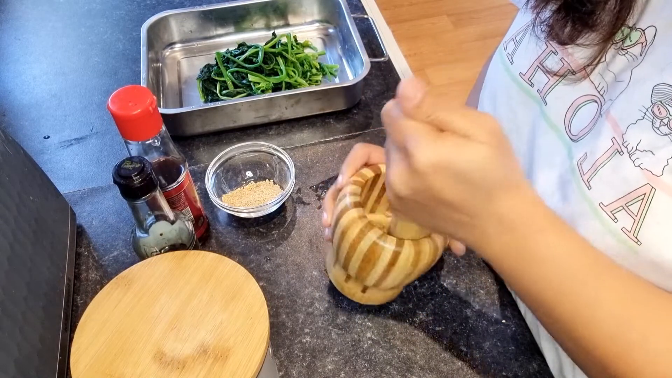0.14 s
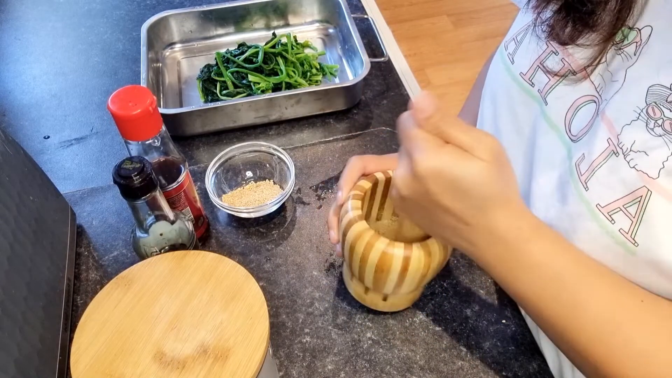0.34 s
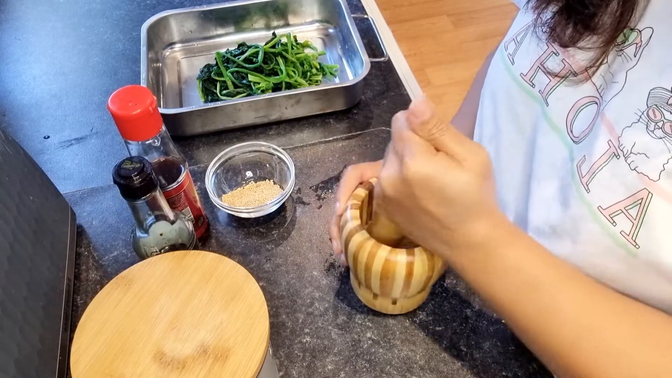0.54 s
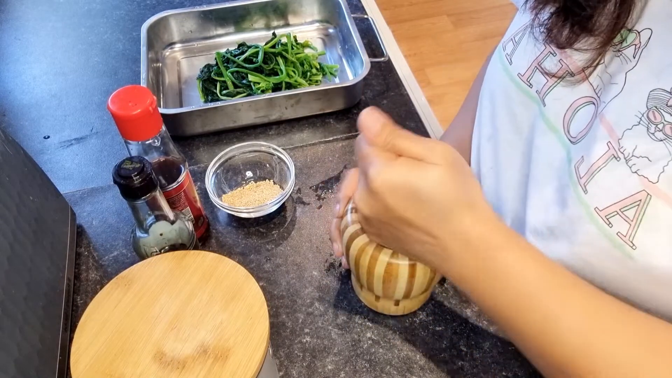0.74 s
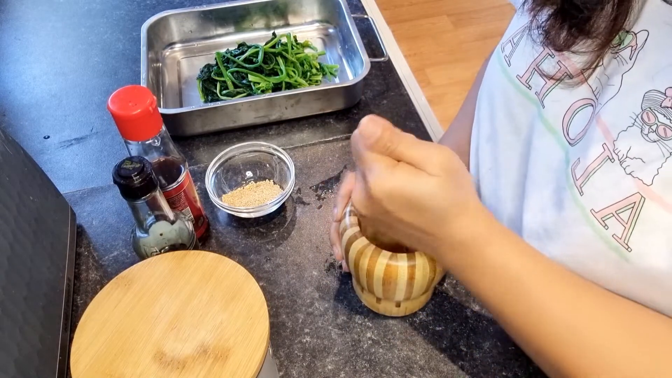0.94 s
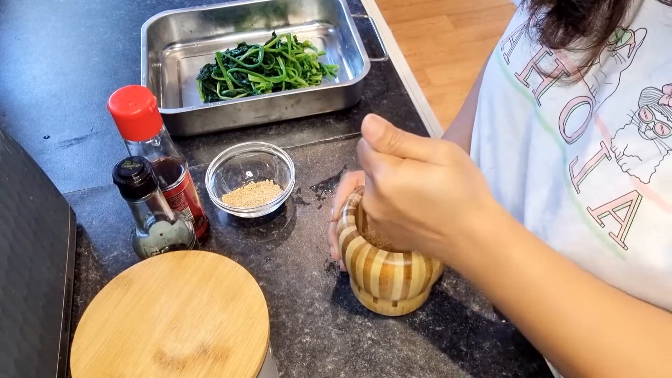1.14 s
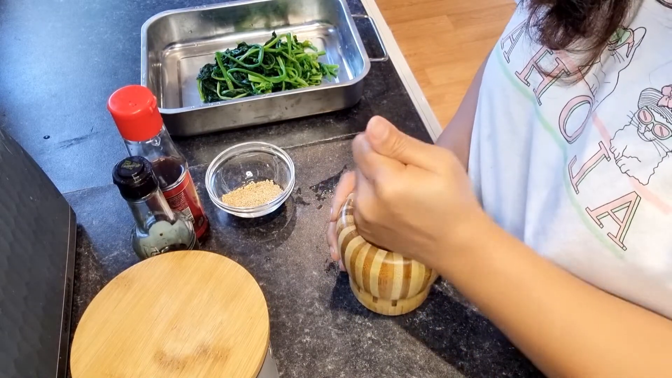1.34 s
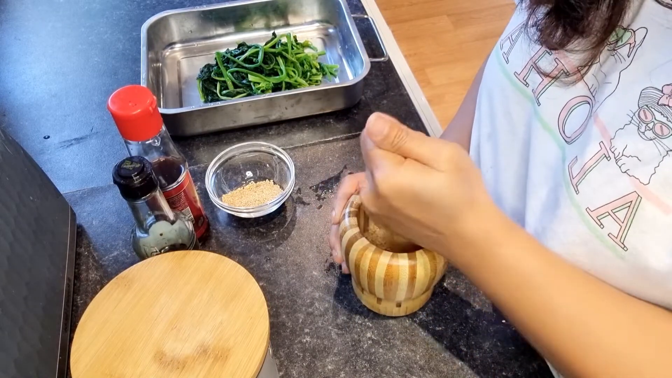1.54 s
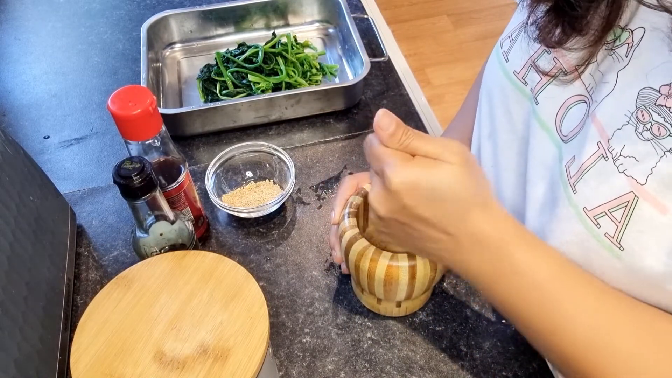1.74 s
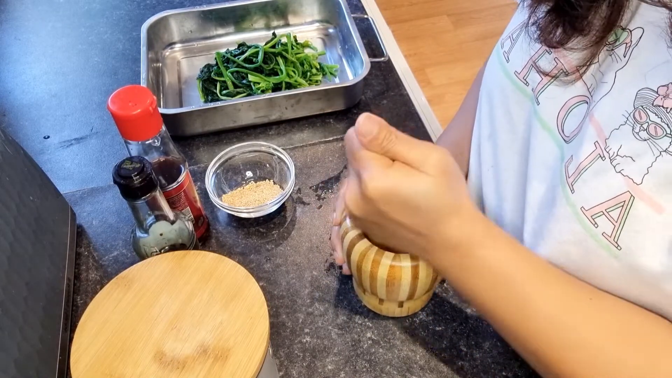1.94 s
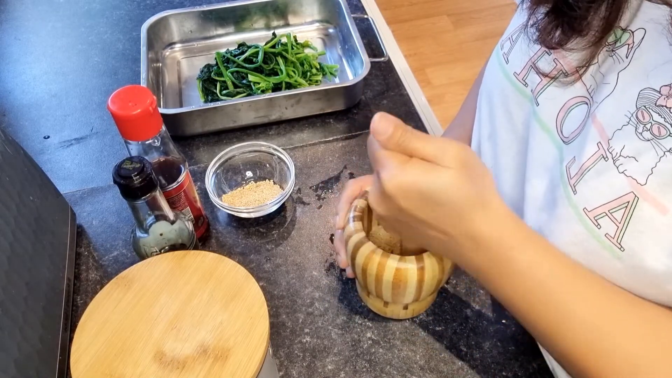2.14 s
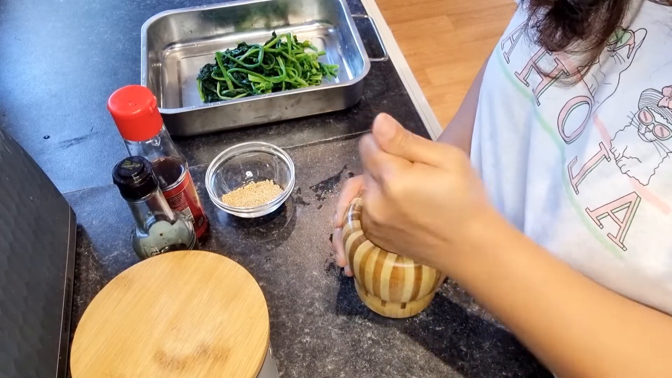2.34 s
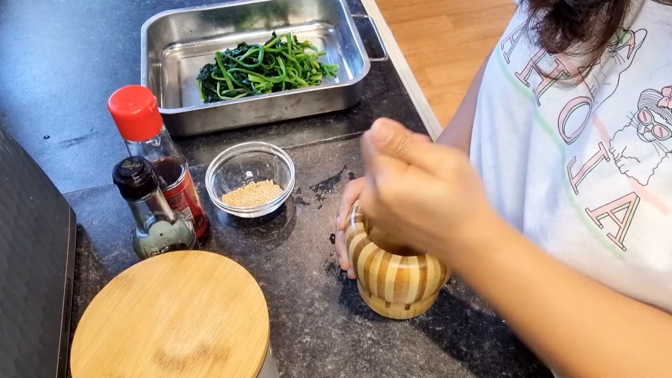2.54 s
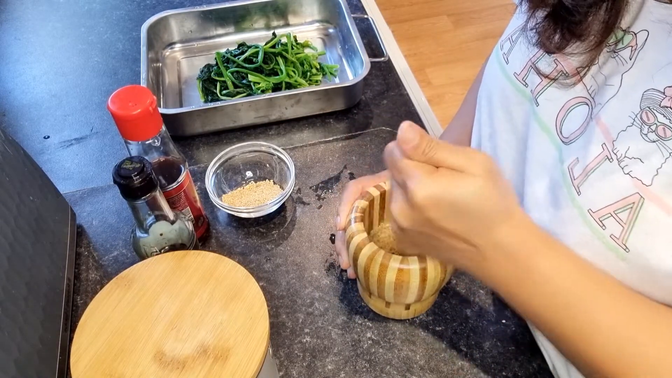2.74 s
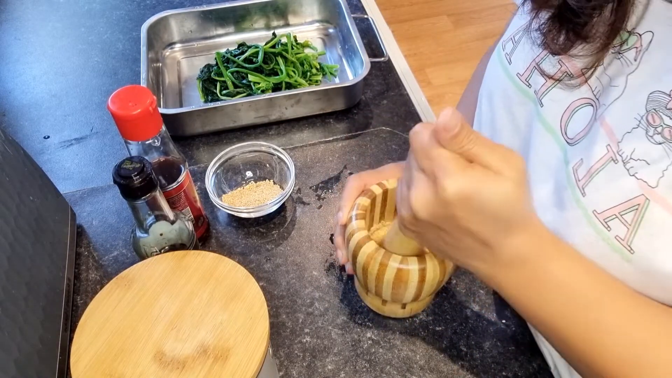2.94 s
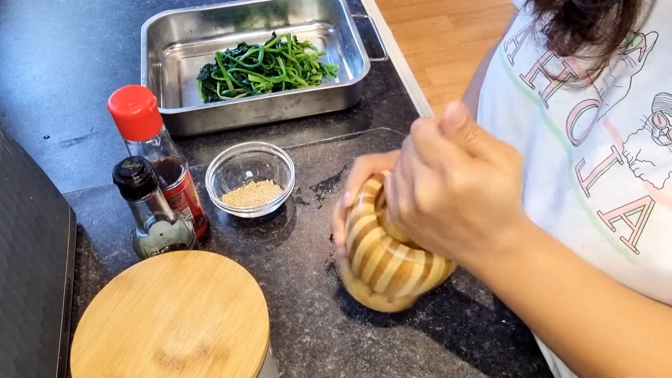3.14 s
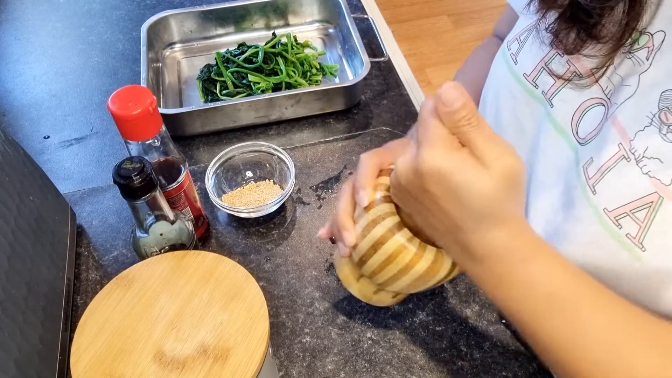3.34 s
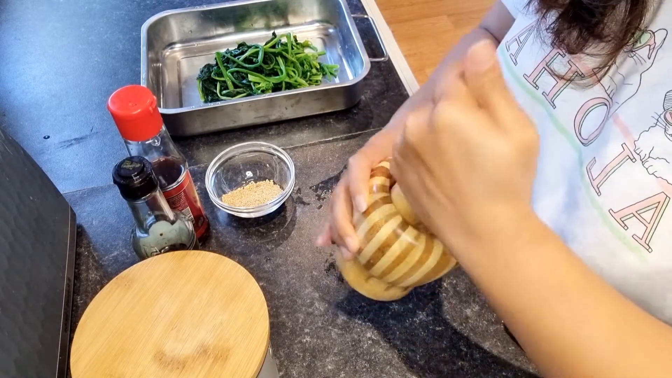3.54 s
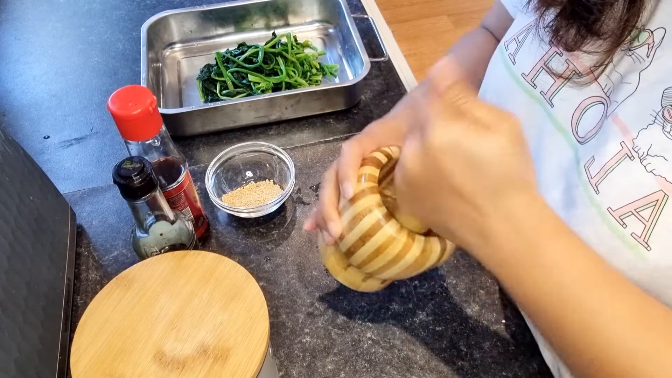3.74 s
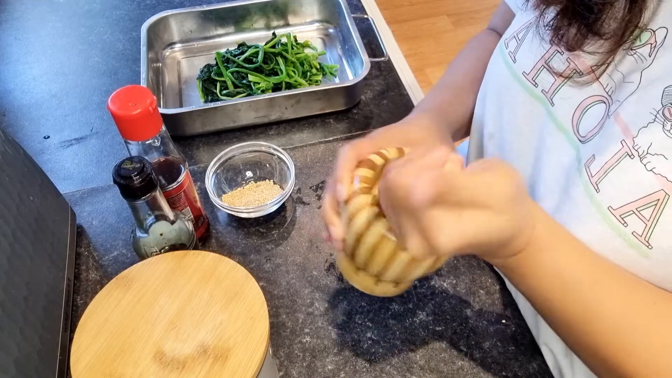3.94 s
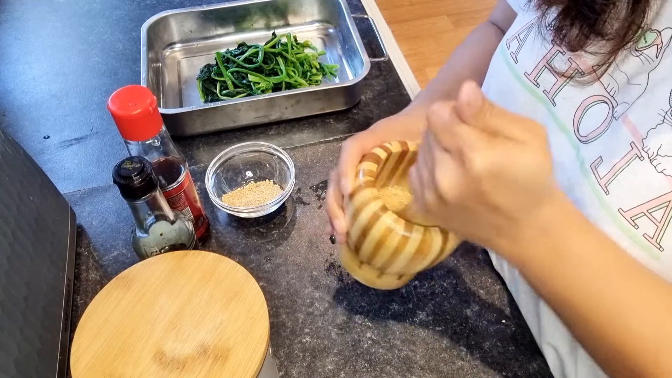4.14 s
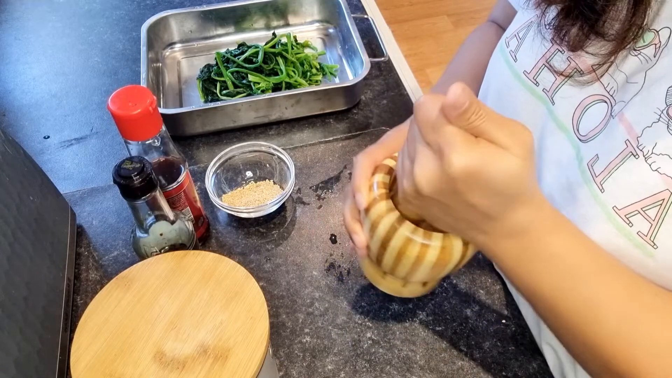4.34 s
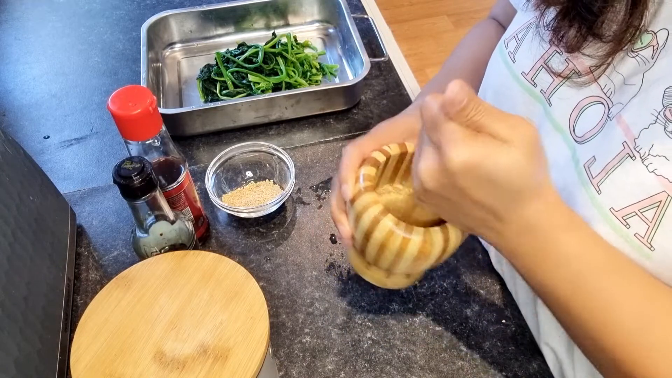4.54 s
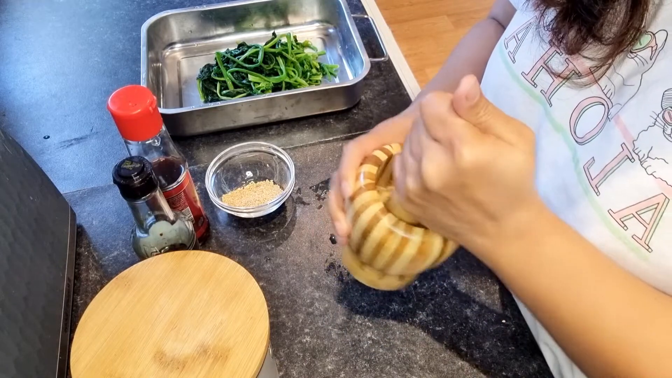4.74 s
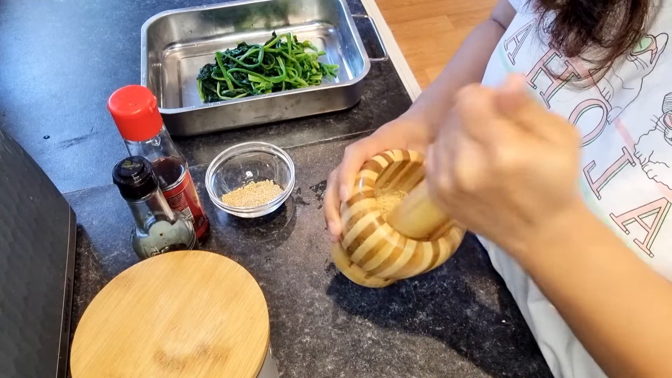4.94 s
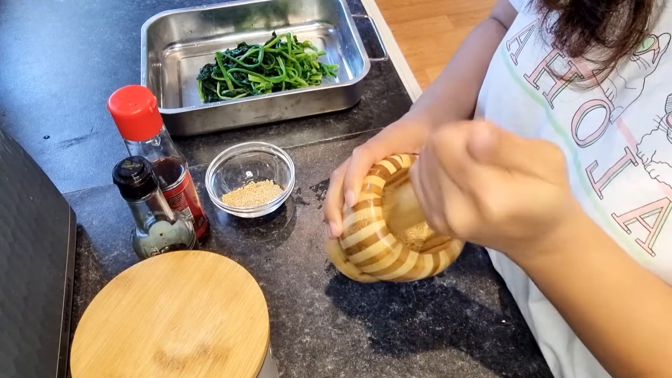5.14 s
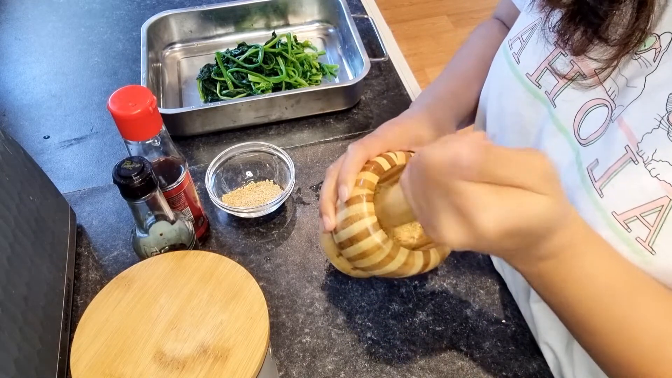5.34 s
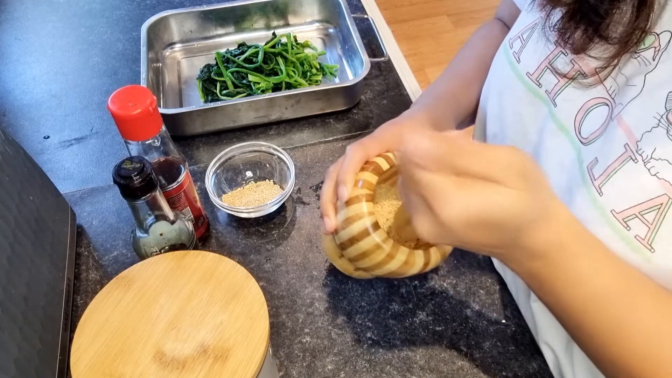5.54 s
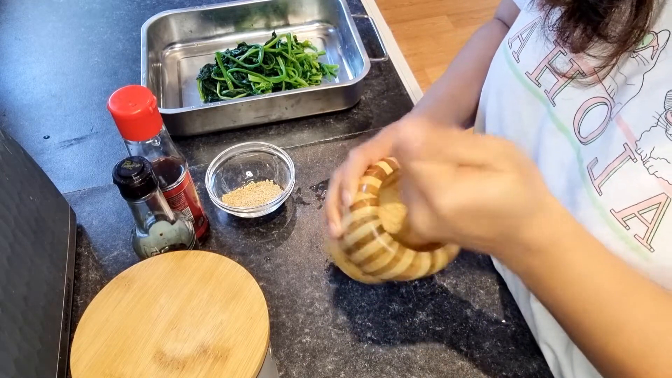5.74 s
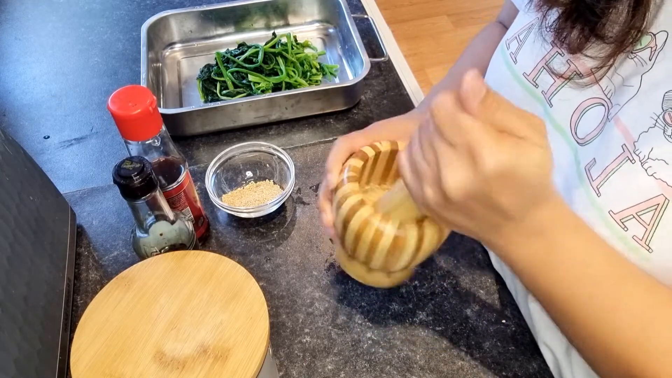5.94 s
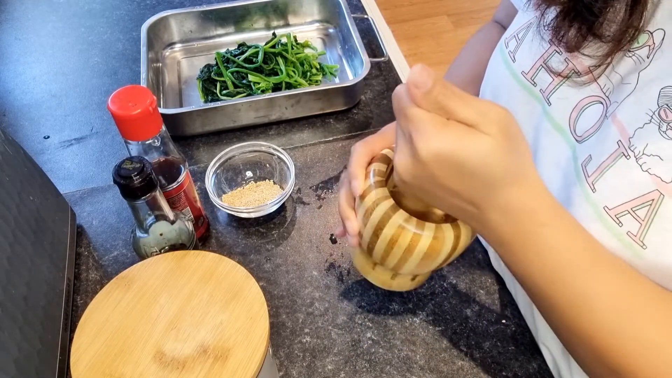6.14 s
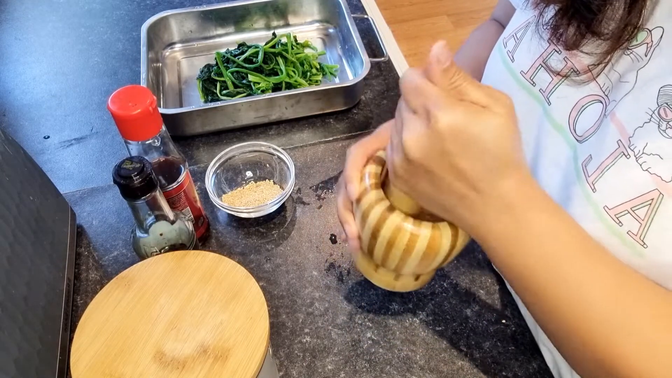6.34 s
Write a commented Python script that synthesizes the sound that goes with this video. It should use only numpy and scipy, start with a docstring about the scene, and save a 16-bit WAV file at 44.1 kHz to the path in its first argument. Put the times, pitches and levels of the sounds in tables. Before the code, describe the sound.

A wooden mortar thuds onto a kitchen worktop and rumbles softly as a pestle grinds sesame seeds inside, rasping and crackling with tiny pops. The mortar is lifted and takes one sharp knock, the grinding goes on, then a quick run of loud, bright wooden blows follows. The stereo microphones are close enough to overload on the hardest hits, and a faint low drone fills the small room.

```python
"""A wooden pestle grinds, then pounds sesame seeds in a wooden mortar, close to a stereo microphone pair.
Standing on the worktop, the mortar thuds and rumbles through the slab; lifted in the hand, it rings
with bright knocks. Seeds rasp along its wall, crackle and burst under the pestle.
The place is a small kitchen with a low drone behind; the hardest blows overload the microphones."""
import sys
import numpy as np
from scipy import signal
from scipy.fft import rfft, irfft, next_fast_len
from scipy.io import wavfile
from scipy.ndimage import uniform_filter1d, map_coordinates

SR = 44100
rng = np.random.default_rng(int(sys.argv[2]) if len(sys.argv) > 2 else 0)


def generate_wav(sig):
    """Save sig (samples, or channels by samples) to the path in sys.argv[1] as 16-bit PCM at SR."""
    pcm = np.round(np.clip(np.atleast_2d(sig).T, -1, 1) * 32767).astype(np.int16)
    wavfile.write(sys.argv[1], SR, pcm)


N = 281378

# room tone of the kitchen: (frequency [Hz], relative density [dB])
ROOM_TONE = [(20, -14.5), (55, 0.5), (85, -3.5), (135, -27), (300, -22), (800, -27.5), (1300, -34.5),
             (3000, -36), (8000, -40), (10500, -53.5), (15000, -48)]
# reverberation of the kitchen: (frequency [Hz], t60 [s])
ROOM_DECAY = [(250, .26), (1000, .26), (2000, .31), (4000, .24), (8000, .2), (16000, .15)]
# slab under the mortar: (frequency [Hz], width [Hz], gain [dB])
SLAB_MODES = [(99, 14, -7), (122, 12.7, -7.5), (158.3, 10, -10), (187.6, 20, -9), (236, 40, -12),
              (316, 29, -4.5), (376, 44, -29)]
# foot of the mortar against the slab: (frequency [Hz], width [Hz], gain [dB])
FOOT_MODES = [(539.5, 46, -4), (764, 56, -3), (950, 105, -9), (1256, 21, -10), (1660, 200, -22.5),
              (1950, 90, -20), (5000, 1510, -13.5)]
# mortar on worktop: (time [s], level [dB], contact corner [Hz], slide [s], weight on the slab [dB])
FOOT_THUDS = [(0.362, -12.5, 910, 0.00083, 3.5), (0.373, -24.5, 2150, 0.0037, -29),
              (0.408, -22.5, 420, 0.0019, 16), (0.653, -38.5, 600, 0.0096, 5),
              (0.869, -23.5, 1110, 0.002, -6), (1.238, -38.5, 725, 0.021, 0), (1.384, -32.5, 674, 0.026, 1),
              (1.407, -26, 760, 0.016, -2.5), (1.486, -29, 620, 0.0059, 8), (1.722, -45, 810, 0.029, 9.5),
              (2.145, -48, 835, 0.026, 2), (2.772, -29.5, 627, 0.015, -1), (2.814, -28.5, 760, 0.0042, -3),
              (2.997, -37.5, 306, 0.016, 8)]
# grinding strokes: (start [s], length [s], relative rasp level [dB], relative crackle level [dB])
GRINDING_STROKES = [(0.176, 0.38, -67, -69), (0.622, 0.32, -61, -67.5), (0.9, 0.23, -55.5, -58),
                    (1.187, 0.66, -59, -64), (1.856, 0.2, -59.5, -51), (2.096, 0.31, -62.5, -58),
                    (2.396, 0.34, -62, -55), (2.759, 0.027, -50, -53.5), (3.091, 0.047, -54.5, -65),
                    (3.217, 0.16, -61.5, -56.5), (3.635, 0.52, -55, -62.5), (4.158, 0.16, -64.5, -59),
                    (4.327, 0.31, -59.5, -54.5), (4.674, 0.11, -54.5, -53), (5.929, 0.13, -49.5, -77),
                    (6.117, 0.49, -62, -62.5)]
# hollow of the mortar, excited by the rasp: (frequency [Hz], width [Hz], gain [dB])
HOLLOW_MODES = [(902, 69, -2), (2290, 86, -13), (3742, 210, -1), (5330, 550, -11.5), (7220, 700, -10)]
# snap of a seed hull: (frequency [Hz], width [Hz], gain [dB])
HULL_MODES = [(3370, 790, -4.5), (5160, 830, -5.5), (7430, 1800, -2.5), (11000, 3500, -3.5),
              (14800, 7600, -3)]
# single seeds bursting: (time [s], relative peak [dB])
SEED_BURSTS = [(0.9326, -20.5), (1.5268, -24.5), (1.8822, -31.5), (1.988, -31), (2.0396, -29.5),
               (2.417, -34), (2.4365, -29.5), (2.586, -25), (3.1305, -40), (3.655, -35.5), (3.9238, -23.5),
               (3.9446, -22.5), (4.1605, -31), (6.0197, -33.5)]
# broad resonances of the lifted mortar, damped by the hand: (frequency [Hz], width [Hz], gain [dB])
MORTAR_MODES = [(531, 26, -10), (824, 600, -16.5), (915, 37, -2.5), (1106, 45, -9), (1380, 350, -10.5),
                (1926, 180, 2), (2175, 150, -3), (2543, 270, -1), (2744, 690, -7), (3370, 170, -23.5),
                (4800, 700, -17.5), (5230, 820, -13), (7200, 1900, -21), (13800, 3600, -47.5)]
# faint ring that outlasts a knock: (frequency [Hz], relative level [dB], t60 [s])
RING_PARTIALS = [(603, -14, 0.2), (905, -4, 0.14), (1122, -7, 0.2), (1290, -14, 0.2), (1551, -8, 0.2),
                 (1790, -6, 0.22), (1868, 0, 0.23), (1985, -1, 0.21), (2074, -2, 0.22), (2153, -10, 0.22),
                 (2336, -13, 0.2), (2514, -10, 0.16), (2754, -14, 0.22)]
# pestle on mortar; a high corner is hard wood on wood:
# (time [s], level [dB], contact corner [Hz], slide [s], hollow low boost [dB])
PESTLE_BLOWS = [(0.129, -53.5, 2000, 0.079, 0), (0.661, -50, 6000, 0.0064, -0.5),
                (2.9915, -25, 2415, 0.0058, 9.5), (3.5650, -9.5, 6000, 0.00073, -1),
                (3.921, -44.5, 9300, 0.0014, 34), (4.074, -52.5, 1500, 0.022, 43),
                (5.049, -12, 6500, 0.0005, -1.5), (5.2407, -4, 5000, 0.00073, -5.5),
                (5.4001, -5.5, 5000, 0.0012, 3.5), (5.5624, -7, 6000, 0.0014, 4.5),
                (5.7086, -4.5, 8000, 0.003, 6), (5.880, -19, 11000, 0.0009, 7),
                (5.891, -19.5, 10000, 0.0055, 15), (5.956, -23.5, 5000, 0.001, 31),
                (5.995, -33.5, 1090, 0.00027, 26)]

TIME = np.arange(N) / SR
HIT_TIME = TIME[:SR // 3]
IMPULSE = 1. * (HIT_TIME == 0)
PESTLE_PAN_DB = 2  # left over right
SET_DOWN_S, LIFTED_S = 0.45, 3.06  # the mortar stands on the worktop in between


def undb(db):
    """Decibels to gain."""
    return 10 ** (np.asarray(db) / 20)


def level(x, db):
    """Scale to an rms level."""
    return x * undb(db) / np.sqrt(np.mean(x ** 2))


def hit_level(x, db):
    """Scale a hit so that its loudest hundredth of a second has this level."""
    power = uniform_filter1d(np.mean(x ** 2, axis=0), SR // 100)
    return x * undb(db) / np.sqrt(power.max())


def add(out, x, start_s):
    """Mix x into out from a start time."""
    i = max(int(start_s * SR), 0)
    out[..., i:i + x.shape[-1]] += x[..., :N - i]


def wander(rate_hz):
    """Smooth random wander with a spread near 1."""
    hold = int(SR / rate_hz)
    steps = np.repeat(rng.standard_normal(N // hold + 1), hold)
    return 1.3 * uniform_filter1d(steps, hold)[:N]


def fade(t60):
    """Exponential decay, 60 dB down after t60 seconds."""
    return np.exp(-np.log(1000) * HIT_TIME / t60)


def shape(x, response):
    """Filter by a response given as a function of frequency."""
    size = next_fast_len(x.shape[-1] + SR // 4)
    f = np.maximum(np.arange(size // 2 + 1) * SR / size, 1)
    return irfft(rfft(x, size) * response(f), size)[..., :x.shape[-1]]


def pass_band(x, kind, corner_hz, order=2):
    """Keep the "low" or the "high" side of a corner."""
    return signal.sosfilt(signal.butter(order, corner_hz, kind, fs=SR, output="sos"), x)


def resonate(x, modes):
    """Drive a set of resonances; neighbours swing in opposite directions."""
    return shape(x, lambda f: sum((-1) ** k * undb(db) / (1 + 1j * (f * f - hz * hz) / (f * width))
                                  for k, (hz, width, db) in enumerate(modes)))


def pan(x, db):
    """Favour the left microphone over the right by this much."""
    return x * undb([[db / 2], [-db / 2]])


def convolve(x, responses):
    """Send a sound through one response for each microphone."""
    return signal.fftconvolve(np.atleast_2d(x), responses, axes=1)[:, :x.shape[-1]]


def room_tone(level_db=-55):
    """The kitchen behind it all: a low drone with faint hiss, nearly alike left and right in the bass."""
    hz, db = np.transpose(ROOM_TONE)
    mid, side = shape(rng.standard_normal((2, N)), lambda f: undb(np.interp(np.log(f), np.log(hz), db)))
    side = shape(side, lambda f: np.clip(f / 1200, .2, 1))
    return level(np.array([mid + side, mid - side]) * undb(wander(5.5)), level_db)


def wall_reflections():
    """The small room answers almost at once, and each octave dies at its own rate."""
    size = len(HIT_TIME)
    f = np.arange(size // 2 + 1) * SR / size
    octaves_hz = np.geomspace(250, 16000, 7)
    spectrum = rfft(rng.standard_normal((2, size)))
    walls = 0
    for hz in octaves_hz:
        band = irfft(spectrum * np.interp(f, octaves_hz, octaves_hz == hz), size)
        walls = walls + band * fade(np.interp(hz, *np.transpose(ROOM_DECAY)))
    return walls * (1 - np.exp(-HIT_TIME / 0.00061))


def mic_paths(near_db, near_t60, room_db, lag_ms, pan_db):
    """Paths to the two microphones: direct, scattered by nearby hands and dishes, and off the walls."""
    delayed = shape(IMPULSE, lambda f: np.exp(-2j * np.pi * f * lag_ms / 1000))
    direct = np.array([IMPULSE, delayed])
    near = rng.standard_normal((2, len(HIT_TIME))) * fade(near_t60) * (HIT_TIME > .0006)
    mid, side = (level(near, near_db) + level(wall_reflections(), room_db)) / np.sqrt(len(HIT_TIME))
    side = shape(side, lambda f: np.minimum(f / 800, 1))  # long waves reach both microphones alike
    return pan(direct + np.array([mid + side, mid - side]) / np.sqrt(2), pan_db)


def contact(corner_hz, slide_s, swell_share=0.14):
    """Force of a blow: a push, then a fading chatter of slips; soft contact loses the treble."""
    slide_s = max(slide_s, .0003)
    swell = 1 - np.exp(-HIT_TIME / (swell_share * slide_s))
    slips = rng.standard_normal(len(HIT_TIME)) * swell * np.exp(-HIT_TIME / slide_s)
    return pass_band(IMPULSE + 3.1 * np.sqrt(slide_s) * slips, "low", corner_hz)


def grains(per_s, spread_db, flicker_db, flicker_hz):
    """Random tiny slips or fractures, mostly small and a few large, flickering in strength."""
    sizes = undb(spread_db * np.minimum(rng.exponential(size=N), 5))
    clicks = (rng.random(N) < per_s / SR) * sizes * rng.choice([-1, 1], N)
    return clicks * undb(flicker_db * wander(flicker_hz))


def worktop_rumble(set_down_db=-46, ease_db_per_s=1.5, ramp_s=0.1, foot_db=-21):
    """Grinding judders into the slab while the mortar stands, easing as it steadies in the hand."""
    slips = grains(per_s=500, spread_db=2.5, flicker_db=3, flicker_hz=14)
    judder = shape(slips, lambda f: 1 / (1 + 1j * f / 100) / (1 + 1j * f / 1500))
    slow_judder = shape(judder, lambda f: 1 / (1 + 1j * f / 70))  # all that the heavy slab follows
    rumble = resonate(slow_judder, SLAB_MODES) + undb(foot_db) * resonate(judder, FOOT_MODES)
    paths = mic_paths(near_db=4.5, near_t60=0.0051, room_db=-15.5, lag_ms=0.0082, pan_db=0.5)
    touching = np.clip(np.minimum(TIME - SET_DOWN_S, LIFTED_S - TIME) / ramp_s + 1, 0, 1)
    easing = undb(-ease_db_per_s * (TIME - SET_DOWN_S))
    return level(convolve(rumble, paths), set_down_db) * touching * easing


def worktop_thuds():
    """The mortar lands and rocks on its foot; its weight sets the slab booming."""
    out = np.zeros((2, N))
    for start_s, db, corner_hz, slide_s, weight_db in FOOT_THUDS:
        paths = mic_paths(near_db=-5.5, near_t60=0.13, room_db=-4.5, lag_ms=0.092, pan_db=0.5)
        force = contact(corner_hz, slide_s)
        thud = resonate(force, FOOT_MODES) + undb(weight_db) * resonate(force, SLAB_MODES)
        add(out, hit_level(convolve(thud, paths), db), start_s)
    return out


def scatter(x, haze_db=-3, tail_s=.01):
    """Tiny sounds from ever-changing spots arrive direct and as a short haze that follows their power."""
    power = signal.lfilter([1], [1, -np.exp(-1 / (tail_s * SR))], x ** 2) / (tail_s * SR)
    haze = np.sqrt(power) * rng.standard_normal((2, N))
    return pan(x + undb(haze_db) * haze, PESTLE_PAN_DB)


def stroke_gains(attack_s=0.024, release_db_per_s=158.5, swell_db_per_s=3.5):
    """Gains of rasp and crackle as the hand leans in, holds and lets go; strokes add in power."""
    rasp_power, crackle_power = 0, 0
    for start_s, length_s, rasp_db, crackle_db in GRINDING_STROKES:
        age = TIME - start_s
        effort = np.clip(age / attack_s, 0, 1) * undb(-release_db_per_s * np.maximum(age - length_s, 0))
        # the wall is rubbed harder as the seeds are pushed aside
        swell_db = swell_db_per_s * (np.clip(age, 0, length_s) - length_s / 2)
        rasp_power += (effort * undb(rasp_db + swell_db)) ** 2
        crackle_power += (effort * undb(crackle_db)) ** 2
    return np.sqrt(rasp_power), np.sqrt(crackle_power)


def grinding(drift_share=0.029):
    """Seeds rasp along the wall, sounding the hollow, and their hulls crackle as they are crushed."""
    slips = grains(per_s=2200, spread_db=2.6, flicker_db=3, flicker_hz=30)
    fractures = grains(per_s=1800, spread_db=3.4, flicker_db=2.2, flicker_hz=45)
    rasp = resonate(scatter(slips), HOLLOW_MODES)
    crackle = resonate(scatter(fractures), HULL_MODES)
    drift = np.cumsum(1 + drift_share * wander(8.1))  # the moving pestle retunes the hollow
    rasp = np.array([map_coordinates(channel, [drift], mode="mirror") for channel in rasp])
    rasp_gain, crackle_gain = stroke_gains()
    return level(rasp, 0.84) * rasp_gain + level(crackle, 0.69) * crackle_gain


def seed_bursts(boost_db=3):
    """Single hulls give way: a quick snap, then the crumbs and the room."""
    out = np.zeros((2, N))
    envelope = fade(.014) + .1 * fade(.13)
    for start_s, db in SEED_BURSTS:
        snap = resonate(rng.standard_normal((2, len(HIT_TIME))) * envelope, HULL_MODES)
        snap = pass_band(snap, "high", 2700, order=4)  # a hull is too small to radiate lows
        add(out, snap / np.abs(snap).max() * undb(db + boost_db), start_s)
    return out


def mortar_knock(pitch, spot_db=1, rebound_db=-11, rebound_s=.00106):
    """The bowl heard close up; each spot struck favours other resonances, and the hands shift the paths."""
    modes = [(hz * pitch, width, db + spot_db * rng.standard_normal()) for hz, width, db in MORTAR_MODES]
    paths = mic_paths(near_db=0, near_t60=0.02, room_db=-8.5, lag_ms=.08, pan_db=PESTLE_PAN_DB)
    knock = resonate(IMPULSE, modes)
    knock = shape(knock, lambda f: 1 + undb(rebound_db) * np.exp(-2j * np.pi * f * rebound_s))
    return convolve(level(knock, 0), paths)


def wood_clack():
    """The broad clack of the contact spreads all round and returns from the room."""
    paths = mic_paths(near_db=12.5, near_t60=0.13, room_db=12, lag_ms=0, pan_db=-3.5)
    clack = resonate(paths, [(1650, 2300, 0)])
    clack += resonate(clack, [(1950, 170, 5)])  # the main wood resonance lingers
    return shape(clack, lambda f: 1 / (1 + 450 / (1j * f)) / (1 + (f / 7500) ** 4))


def pestle_blows(ring_db=-9, clack_db=-6, standing_pitch=0.82):
    """Each blow draws a knock, a ring and a clack; the worktop loads the standing mortar's knock lower."""
    out = np.zeros((2, N))
    ring = sum(undb(db) * np.sin(2 * np.pi * hz * HIT_TIME) * fade(t60) for hz, db, t60 in RING_PARTIALS)
    for start_s, db, corner_hz, slide_s, hollow_db in PESTLE_BLOWS:
        pitch = standing_pitch if SET_DOWN_S < start_s < LIFTED_S else 1
        body = mortar_knock(pitch) + level(ring, ring_db) + level(wood_clack(), clack_db)
        force = contact(corner_hz, slide_s)
        # a blow square on the bottom drives the low resonances harder than one on the wall
        force = shape(force, lambda f: ((undb(hollow_db / 2) + 1j * f / 1300) / (1 + 1j * f / 1300)) ** 2)
        force = pass_band(force, "high", 190)  # the small bowl radiates little bass
        add(out, hit_level(convolve(force, body), db), start_s)
    return out


def scene():
    """Mortar and worktop close to the microphones, the kitchen behind."""
    return pestle_blows() + worktop_thuds() + worktop_rumble() + grinding() + seed_bursts() + room_tone()


def record(dry):
    """At this distance the hardest blows clip the microphones; the top is cut at 16 kHz."""
    top_cut = signal.ellip(8, .2, 70, 16000, fs=SR, output="sos")
    return signal.sosfilt(top_cut, np.clip(dry, -1, 1))


dry = scene()
out = record(dry)
generate_wav(out)
```